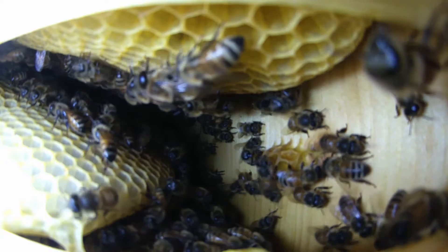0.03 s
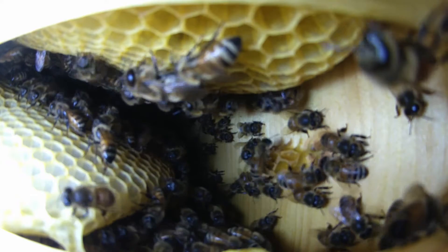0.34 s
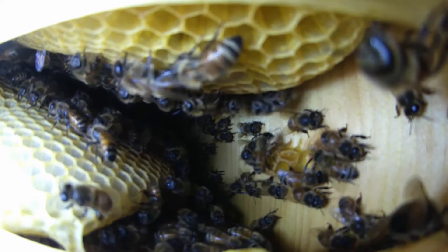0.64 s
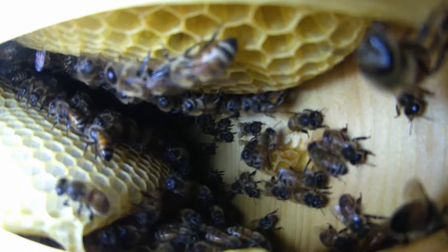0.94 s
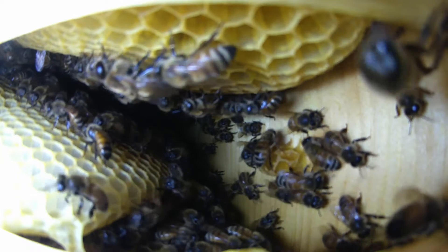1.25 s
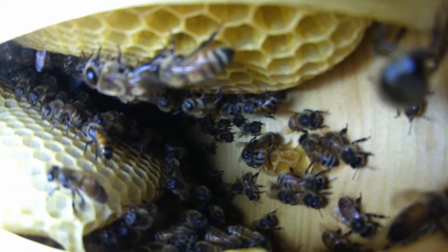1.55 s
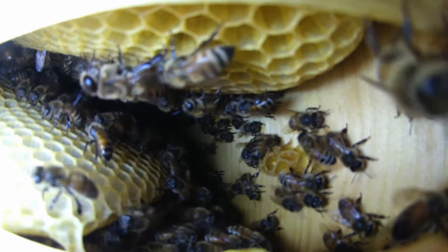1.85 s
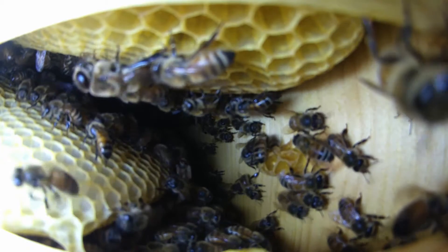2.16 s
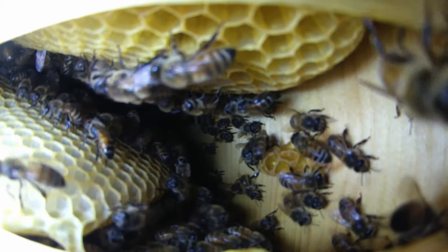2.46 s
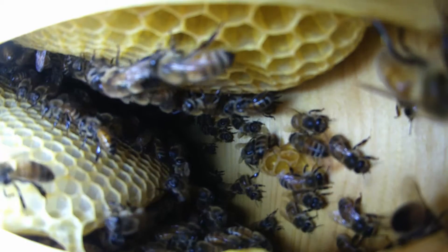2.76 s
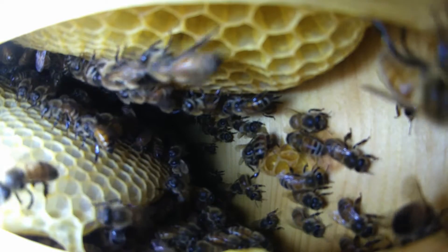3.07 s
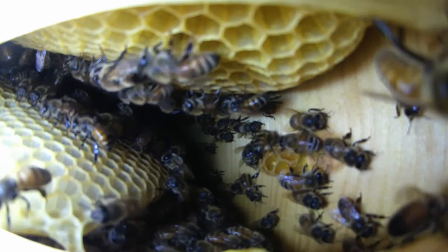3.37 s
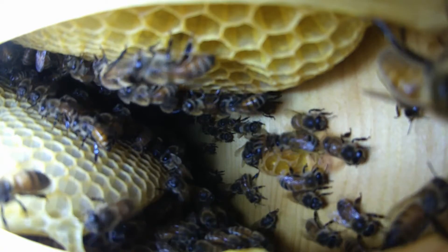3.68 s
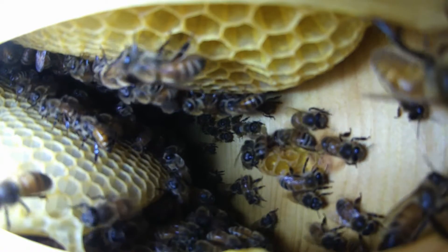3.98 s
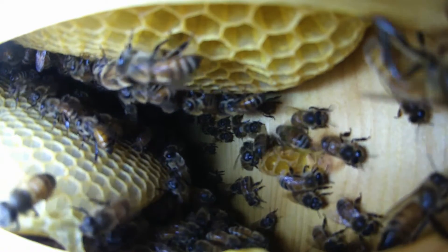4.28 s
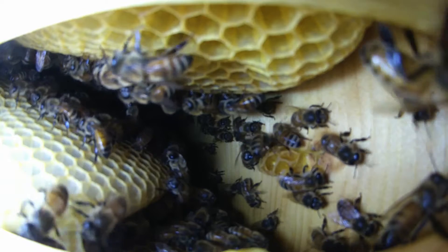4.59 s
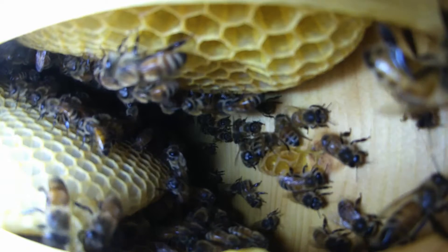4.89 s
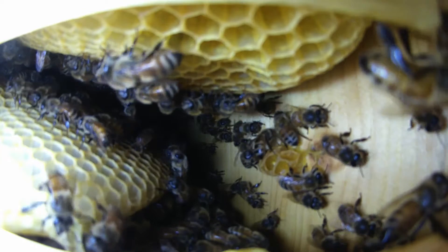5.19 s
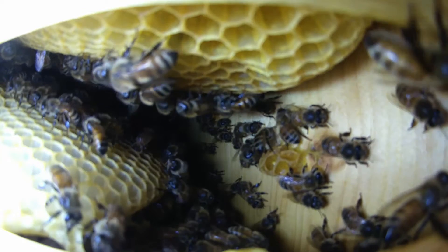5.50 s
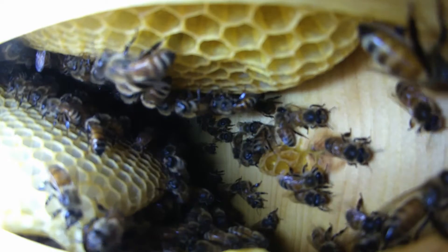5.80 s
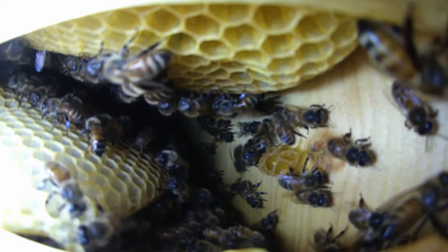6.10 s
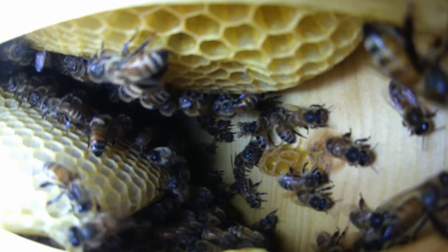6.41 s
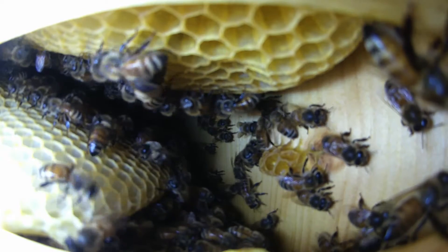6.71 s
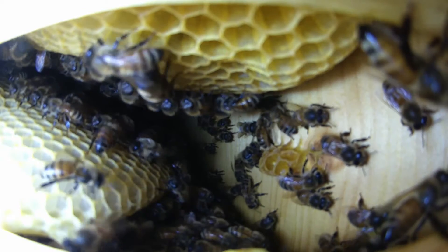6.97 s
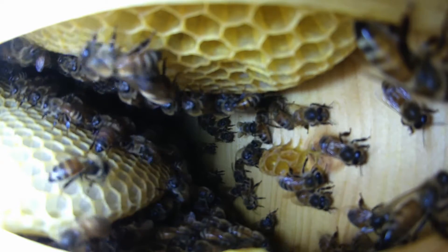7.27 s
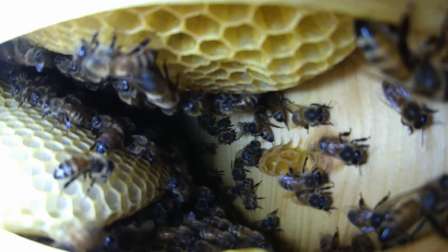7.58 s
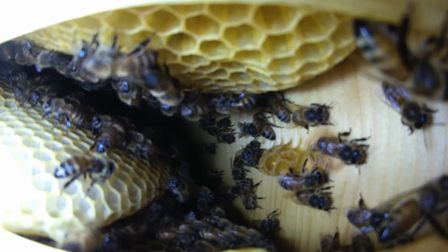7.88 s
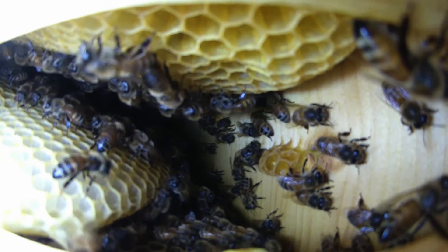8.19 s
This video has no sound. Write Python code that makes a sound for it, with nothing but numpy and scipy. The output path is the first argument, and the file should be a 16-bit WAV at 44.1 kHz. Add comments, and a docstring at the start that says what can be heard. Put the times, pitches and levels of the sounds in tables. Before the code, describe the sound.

A quiet beehive hum and rustle, with close thuds and scratches of bees on the microphone, and a hard knock near the end.

```python
"""Inside a honeybee hive

A small camera sits among the combs, the colony's wings humming and feet rustling all around it.
Right at the microphone, bees crawl over the housing, which rings as they thud, scrape and tick.
Late on, hard scrapes end in one knock that overloads the microphone and sets the mount swaying."""
import sys
import numpy as np
from scipy import signal
from scipy.fft import rfft, irfft, next_fast_len
from scipy.io import wavfile
from scipy.ndimage import map_coordinates

SR = 44100
rng = np.random.default_rng(int(sys.argv[2]) if len(sys.argv) > 2 else 0)


def store_pcm(level_fs):
    """Save levels as 16-bit WAV."""
    pcm = np.round(np.clip(level_fs, -1, 1) * 32767).astype(np.int16)
    wavfile.write(sys.argv[1], SR, np.atleast_2d(pcm).T)


N = 372644

BUMP_RISE, SCRAPE_RISE, BRUSH_RISE = 0.25, 0.33, 0.3  # share of a stroke spent pressing harder


def colony():
    """All around the microphone: buzzing wings, slower fanning wings, countless feet on the combs."""
    # the colony's slow swells: (time [s], relative hum level [dB], relative rustle level [dB])
    swells = [(0, -47.5, -56), (1, -48, -52), (1.6, -50, -54.5), (2.3, -43.5, -51.5), (2.85, -50.5, -58.5),
              (3.3, -49, -53.5), (3.8, -48.5, -57), (4.4, -45, -52.5), (4.9, -48, -55), (5.3, -51.5, -60),
              (5.8, -49.5, -56.0), (6.7, -45, -55.5), (7.6, -48, -55), (8.45, -46, -55)]
    # spectrum of feet on comb: (frequency [Hz], gain [dB])
    rustle = [(100, -19), (200, 3), (380, 3), (480, 0.5), (540, -2.5), (630, 1.5), (780, -6.5), (900, -1.5),
              (1200, -12), (1900, -21.5), (3200, -23), (5000, -42.5), (9000, -50.5), (15000, -58)]
    times, *levels = np.transpose(swells)
    hum_db, rustle_db = [np.interp(np.arange(N) / SR, times, db) for db in levels]
    buzz = amp(hum_db - 3) * swarm(beat_hz=254.8, scatter=0.065, waver=0.035, swell_db=4.5, count=8)
    fanning = amp(-55) * swarm(beat_hz=124.6, scatter=0.19, waver=0.087, swell_db=4, count=4)
    feet = amp(rustle_db - 0.5) * unit(colour(grains(N, rate=2000, spread_db=-1), rustle))
    bustle = amp(1.7 * wobble(11))  # the whole cluster stirs and settles
    return bustle * (buzz + fanning + feet)


def swarm(beat_hz, scatter, waver, swell_db, count):
    """Several bees, each with its own wavering wingbeat, coming and going."""
    # wingbeat harmonics 1-5: (relative level [dB])
    harmonics = [-2.5, -19.5, -21, -31, -31]
    total = np.zeros(N)
    for place in np.linspace(-1, 1, count):
        pitch = beat_hz * (1 + scatter * place + waver * (wobble(2.8) + wobble(40)))
        phase = 2 * np.pi * (np.cumsum(pitch) / SR + rng.random())
        wings = sum(amp(db) * np.sin(k * phase) for k, db in enumerate(harmonics, 1))
        total += amp(swell_db * wobble(9)) * wings
    return unit(total)


def scuffs():
    """Bees crawl over the housing, right at the microphone: dull bumps, hard scrapes, light brushes."""
    # a body bumps softly: (time [s], length [s], thud level [dB])
    bumps = [(0.059, 0.088, -41.5), (0.769, .06, -47), (1.104, 0.096, -39.5), (1.702, 0.074, -42.5),
             (2.274, 0.063, -45.5), (2.55, 0.082, -40), (2.92, 0.12, -43.5), (3.941, 0.062, -44.5),
             (4.018, 0.051, -37), (4.294, .06, -38.5), (4.43, 0.1, -40.5), (4.666, 0.08, -44.5),
             (4.964, .1, -37.5), (5.082, .07, -33), (5.39, .077, -43), (5.581, .058, -39.5),
             (5.749, 0.038, -33.5), (5.785, 0.087, -40), (6.185, 0.054, -43.5), (6.481, 0.071, -39.5),
             (6.584, .05, -41.5), (6.619, 0.067, -37.5), (7.982, 0.05, -38), (8.408, 0.054, -46.5)]
    # legs scrape hard: (time [s], length [s], rub level [dB], weight [dB re rub], claws [dB re rub])
    scrapes = [(1.85, 0.074, -47.5, 0, -16), (1.916, 0.068, -39.5, -5, -23),
               (1.962, 0.079, -36.5, 5, -20.5), (2.063, 0.042, -42, -3.5, -21.5),
               (6.333, .06, -43, -8, -11), (6.385, .05, -35.5, -1, -19.5), (6.421, 0.059, -38.5, 2, -18.5),
               (6.833, 0.047, -26.5, 5, -10.5), (6.882, .03, -24, -1.5, -7), (6.901, .039, -27, -6.5, -4.5),
               (6.938, 0.041, -38.5, 2.5, -2), (7.018, 0.093, -31.5, -7, -4)]
    # wings and hair brush past: (time [s], length [s], scratch level [dB], added treble [dB/octave])
    brushes = [(0.495, 0.029, -66, -3), (1.343, 0.041, -66.5, 12), (2.25, 0.16, -58, 0.5),
               (2.388, 0.25, -66, 1), (3.291, .25, -67.5, 10), (3.549, 0.037, -71, 16), (4.69, .08, -67, 7),
               (4.819, .039, -61.5, 0), (4.869, 0.038, -56.5, 2), (6.026, .045, -65, 0)]
    track = np.zeros(N)
    for s, length, db in bumps:
        add(track, s, drag(length, BUMP_RISE, db, db - 9.5, db - 25.5, grain_db=1))
    for s, length, db, weight_db, claw_db in scrapes:
        add(track, s, drag(length, SCRAPE_RISE, db + weight_db, db, db + claw_db, grain_db=-1))
    for s, length, db, air_db in brushes:
        add(track, s, drag(length, BRUSH_RISE, db + 8, db + 4.5, db, grain_db=3, air_db=air_db))
    return track


def drag(length, rise_share, thud_db, rub_db, scratch_db, grain_db, air_db=0):
    """One swell of slips on the housing: the body thuds, the legs rub, the claws scratch."""
    # force spectra of body, legs and claws: (frequency [Hz], gain [dB])
    thud = [(25, -7), (70, -3), (110, 0), (200, -6.5), (300, -5), (500, -33.5), (1200, -65.5)]
    rub = [(150, -34.5), (290, -1), (400, 5.5), (900, 0.5), (1500, -5.5), (2500, -19), (6000, -61.5)]
    scratch = [(700, -31.5), (1500, -1), (2300, 1.5), (3300, 1), (6000, -3), (10000, -9), (13600, -11),
               (16000, -11.5)]
    t = np.arange(int((length + 0.055) * SR)) / SR
    ring = housing_ring(spot_db=3)
    rise = length * rise_share
    landing_s = 0.0053  # a foot that presses faster than this lands with its whole weight
    landing_weight = min(landing_s / rise, 1)
    pressure = np.interp(t, [0, rise, length], [landing_weight, 1, 0]) ** 0.95
    pressure *= amp(1.5 * wobble(140, size=len(t)))  # uneven grip
    legs, claws = np.array(rub, float), np.array(scratch, float)
    legs[:, 0] *= 2 ** (0.05 * (scratch_db - rub_db + 13))  # more claw, higher rub
    claws[:, 1] += (air_db + 0.31 * (scratch_db + 41)) * np.log2(1 + claws[:, 0] / 5000)  # hard = bright
    contacts = [(thud, thud_db, grains(len(t), rate=3700, spread_db=0.5)),
                (legs, rub_db, grains(len(t), rate=3100, spread_db=3.5)),
                (claws, scratch_db, grains(len(t), rate=4600, spread_db=grain_db))]
    sound = np.zeros(len(t))
    for spectrum, db, slips in contacts:
        force = colour(pressure * slips, spectrum)
        sound += amp(db) * unit(signal.fftconvolve(force, ring)[:len(t)])
    return np.sqrt(length / t[-1]) * sound


def knocks():
    """Light taps on the housing, then the hard knock that shakes the mount."""
    # strikes on the housing: (time [s], level [dB], chatter t60 [s])
    taps = [(1.705, -52, 0.15), (1.799, -40, 0.073), (1.829, -32.5, 0.062), (4.1647, -39, 0.064),
            (5.566, -39, 0.061), (7.021, -26.5, 0.16)]
    knock = (7.1045, -2.6, .08)
    # their force spectra: (frequency [Hz], gain [dB])
    tap_force = [(40, -2.5), (200, 12), (500, 4), (750, 12.5), (1300, 10.5), (2800, 3.5), (7000, -1),
                 (10000, -11), (15000, -18)]
    knock_force = [(40, -6), (130, -8.5), (220, -0.5), (320, 1.5), (480, 1.5), (750, 2.5), (1050, 2.5),
                   (1400, 0.5), (3000, -4), (7000, -12.5), (10000, -21.5), (15000, -20.5)]
    track = np.zeros(N)
    for s, db, t60 in taps:
        add(track, s, amp(db) * strike(housing_ring(spot_db=1), tap_force, t60, impact=3.4))
    s, db, t60 = knock
    add(track, s, amp(db) * strike(housing_ring(spot_db=-1), knock_force, t60, impact=8.8))
    add(track, s, mount())
    return track


def strike(ring, spectrum, t60, impact):
    """One impact and its quickly dying chatter, with the energy of 50 ms at rms 1."""
    t = np.arange(len(ring)) / SR
    push = amp(-60 * t / t60) * rng.standard_normal(len(t))
    push[0] += impact
    sound = signal.fftconvolve(colour(push, spectrum), ring)[:len(t)]
    return sound / np.sqrt(np.sum(sound ** 2) * 20 / SR)


def housing_ring(spot_db):
    """The housing's answer to one impulse; every spot excites the damped modes differently."""
    # housing modes: (frequency [Hz], bandwidth [Hz], gain [dB])
    modes = [(112, 58, 3), (172, 74, 1), (245, 41, -3.5), (353, 25, -2.5), (391, 70, -2.5),
             (445.4, 44, -0.5), (632, 100, 2), (702.7, 44, -0.5), (837, 92, -6.5), (1012, 22, -7.5),
             (1114, 57, -6.5), (1275, 50, -7), (1374, 62, -12), (1610, 23, -22), (2040, 60, -19),
             (2492, 100, -5.5), (2937, 130, -4.5), (3105, 69, -11.5), (3320, 80, -10), (3420, 140, -10.5),
             (3900, 180, -16), (4570, 200, -25.5), (5550, 500, -29.5), (7200, 1400, -32.5)]
    t = np.arange(SR // 8) / SR
    ring = np.zeros(len(t))
    for hz, width, db in modes:
        gain = amp(db + spot_db * rng.standard_normal()) * 2 * np.pi * width / SR
        ring += gain * np.exp(-np.pi * width * t) * np.cos(2 * np.pi * hz * t)
    ring[0] += amp(-36)  # the contact itself, heard directly
    return ring


def mount():
    """The camera's mount rings on after the knock and sways slowly."""
    # mount modes: (frequency [Hz], level [dB], t60 [s])
    modes = [(173.7, -14.5, 0.26), (329, -10.5, 0.15), (432, -9.5, 0.17), (728, -0.5, .11),
             (829, -33.5, 0.37), (1312, -20, .11)]
    # spectrum of its slow swing: (frequency [Hz], gain [dB])
    swing = [(15, -24.5), (30, 3), (39, 2.5), (55, -17), (150, -24.5), (400, -56), (1500, -88.5)]
    t = np.arange(SR // 2) / SR
    ring = sum(amp(db - 60 * t / t60) * np.sin(2 * np.pi * hz * t) for hz, db, t60 in modes)
    envelope = np.interp(t, [0, 0.06, 0.17, 0.21, 0.32], [0.4, 1, 0.9, 0.3, 0])
    sway = envelope * colour(rng.standard_normal(SR), swing)[-len(t):]
    return ring + amp(-29.5) * unit(sway)


def squeaks():
    """A claw sticks and slips fast enough to give a brief, unsteady tone."""
    # claw squeaks on the housing: (time [s], length [s], pitch [Hz], level [dB])
    slips = [(1.914, 0.03, 3080, -57), (2.061, .035, 1388, -50.5), (2.068, 0.028, 3080, -57.5)]
    track = np.zeros(N)
    for s, length, hz, db in slips:
        size = int(length * SR)
        pitch = hz * (1 + 0.045 * wobble(430)[:size])
        tone = np.sin(2 * np.pi * np.cumsum(pitch) / SR)
        add(track, s, amp(db) * unit(np.hanning(size) * tone))
    return track


def footfalls(per_second=3, length=0.05):
    """Single feet shuffle faintly on the housing at random moments."""
    track = np.zeros(N)
    for when, weight in rng.random((int(per_second * N / SR), 2)):
        db = -75 - 1.5 * np.log(1 - weight)
        add(track, when * N / SR, drag(length, BUMP_RISE, db + 16, db + 10, db, grain_db=1))
    return track


def hive_box(contacts, t60=0.7):
    """Around the camera, the wooden box and its combs ring on faintly after a contact."""
    # spectrum of the box's ring: (frequency [Hz], gain [dB])
    wood = [(50, 6), (150, 2), (1000, -3), (2500, -9), (4500, -2.5), (12000, -14.5)]
    t = np.arange(SR // 2) / SR
    tail = colour(rng.standard_normal(len(t)) * amp(-60 * t / t60), wood)
    return amp(-40.5) * signal.fftconvolve(contacts, tail / np.linalg.norm(tail))[:N]


def noise_floor(whine_hz=11079, ripple_hz=60):
    """Low rumble of the hive box, with the camera's own hiss and thin electronic whine."""
    # steady noise spectra: (frequency [Hz], gain [dB])
    box_rumble = [(10, -8), (30, 3.5), (58, -1), (80, -10.5), (160, -17.5), (400, -40), (1500, -70)]
    camera_hiss = [(100, 8.5), (5000, 4), (9000, -2.5), (12000, 0.5), (14200, 1), (15800, -20.5)]
    t = np.arange(N) / SR
    rumble = amp(-51 + 2.1 * wobble(5.5)) * unit(colour(rng.standard_normal(N), box_rumble))
    hiss = amp(-75) * unit(colour(rng.standard_normal(N), camera_hiss))
    ripple = np.cos(2 * np.pi * ripple_hz * t)
    whine = amp(-92.5) * (1 + ripple) * np.sin(2 * np.pi * whine_hz * t + wobble(25))
    return rumble + whine + hiss * (1 + 0.18 * ripple)


def grains(size, rate, spread_db):
    """Tiny slips of random size at random moments, rms 1."""
    chance, sizes = rng.random(size), rng.standard_normal((2, size))
    return unit((chance < rate / SR) * sizes[0] * amp(spread_db * sizes[1]))


def colour(x, points):
    """x through a causal filter shaped by (frequency [Hz], gain [dB]) points."""
    size = 2 * next_fast_len(len(x) // 2 + 4096)
    hz, db = np.transpose(points)
    gain = amp(np.interp(np.log(np.fft.rfftfreq(size, 1 / SR) + 1), np.log(hz), db))
    cepstrum = irfft(np.log(gain))
    cepstrum[1:size // 2] *= 2  # fold to minimum phase
    cepstrum[size // 2 + 1:] = 0
    return irfft(rfft(x, size) * np.exp(rfft(cepstrum)))[:len(x)]


def wobble(rate, size=N):
    """A smooth random curve, rate knots a second."""
    knots = rng.standard_normal(int(size * rate / SR) + 4)
    return map_coordinates(knots, [np.arange(size) * rate / SR])


def amp(db):
    """Decibels to gain."""
    return 10 ** (np.asarray(db) / 20)


def unit(x):
    """x at rms 1."""
    return x / np.sqrt(np.mean(x ** 2) + 1e-20)


def add(track, s, sound):
    """Mix a sound into the track at time s."""
    start = max(round(s * SR), 0)
    part = track[start:start + len(sound)]
    part += sound[:len(part)]


def scene():
    """One microphone inside the hive: the contacts close up, the colony behind."""
    contacts = knocks() + scuffs() + squeaks() + footfalls()
    return (colony() + contacts + hive_box(contacts) + noise_floor())[None]


def record(dry):
    """The camera's input clips just under full scale, and the top treble is cut off."""
    clipped = np.clip(dry, -0.96, 0.96)
    lowpass = signal.firwin(301, cutoff=15850, fs=SR)
    return signal.fftconvolve(clipped, lowpass[None], mode="same", axes=1)


dry = scene()
out = record(dry)
store_pcm(out)
```